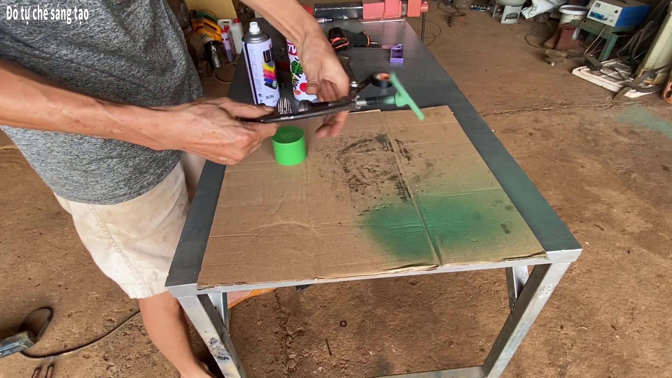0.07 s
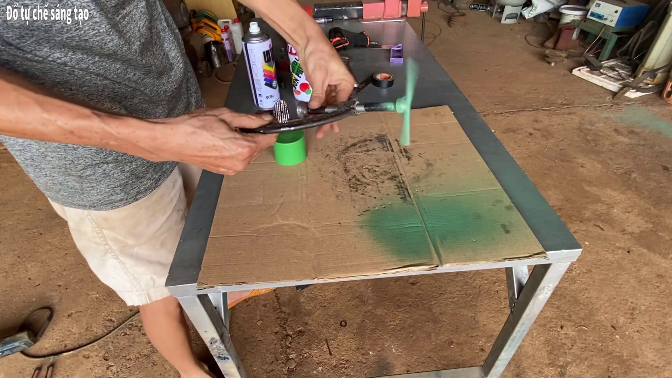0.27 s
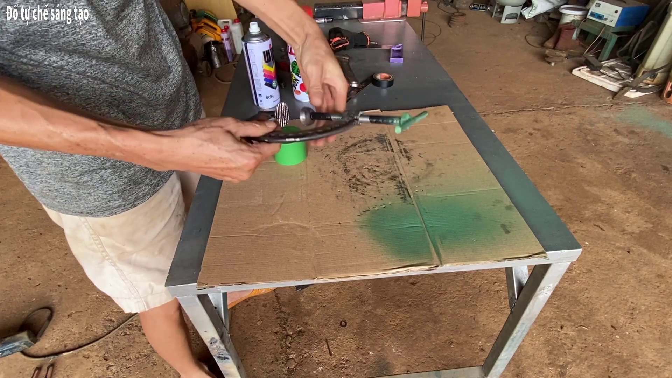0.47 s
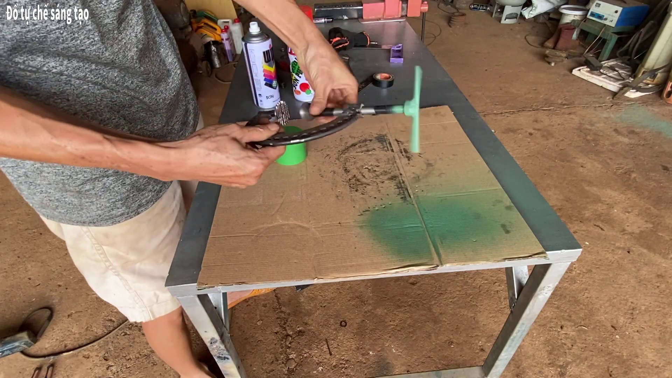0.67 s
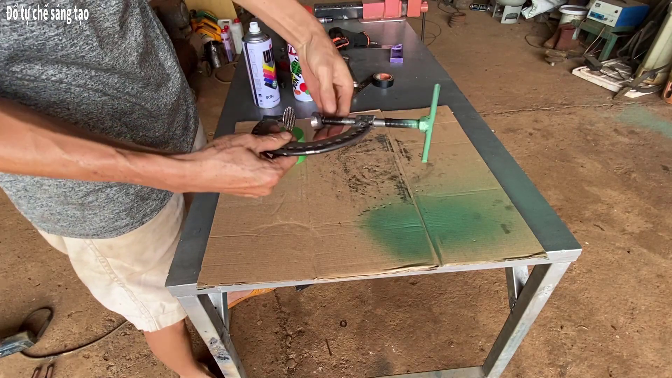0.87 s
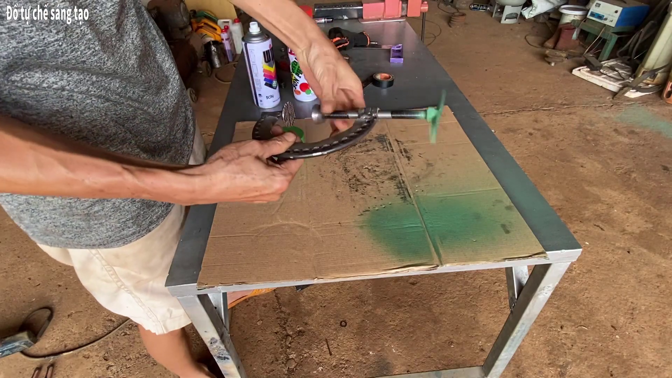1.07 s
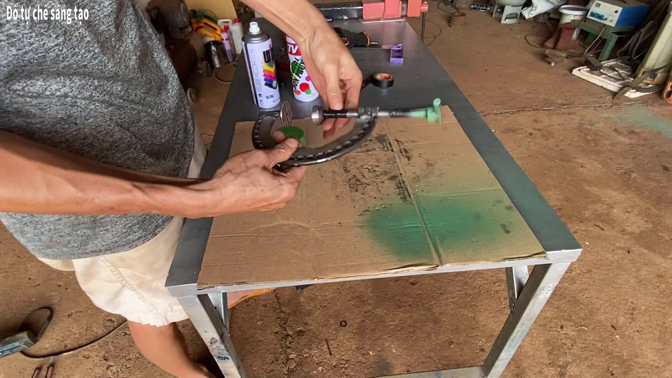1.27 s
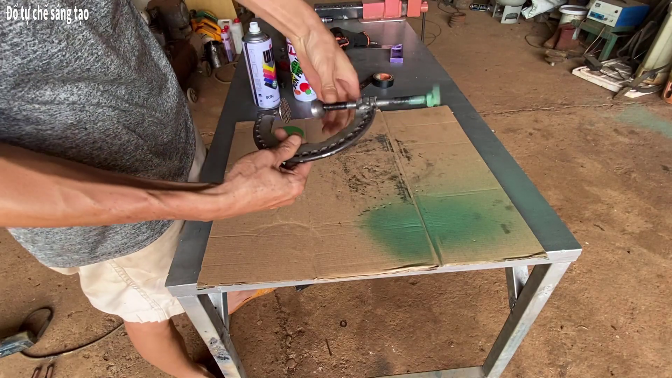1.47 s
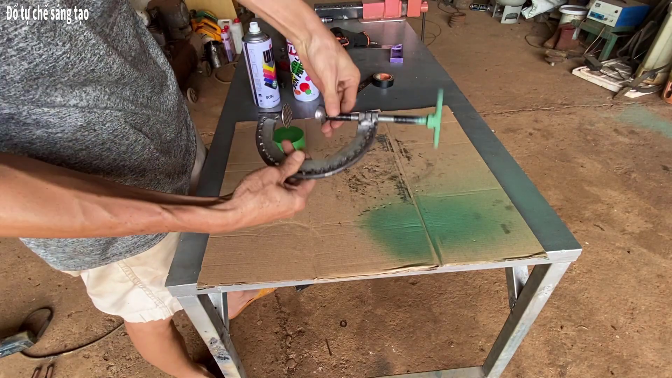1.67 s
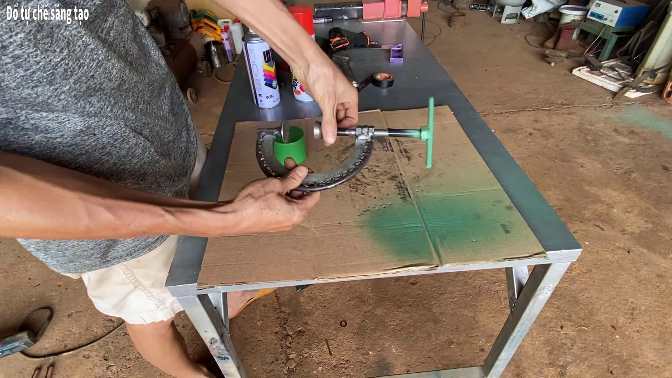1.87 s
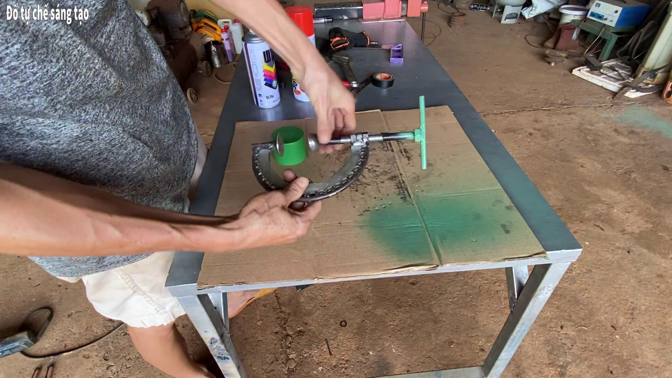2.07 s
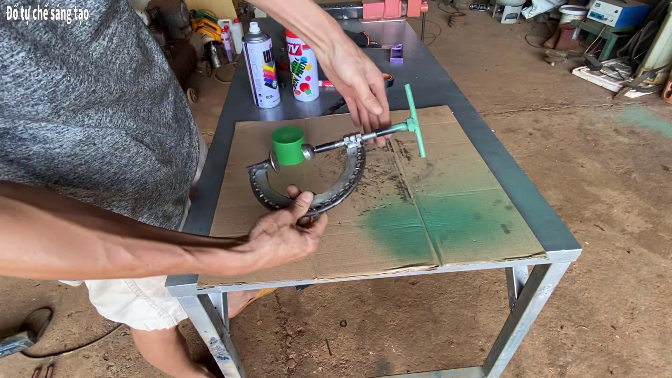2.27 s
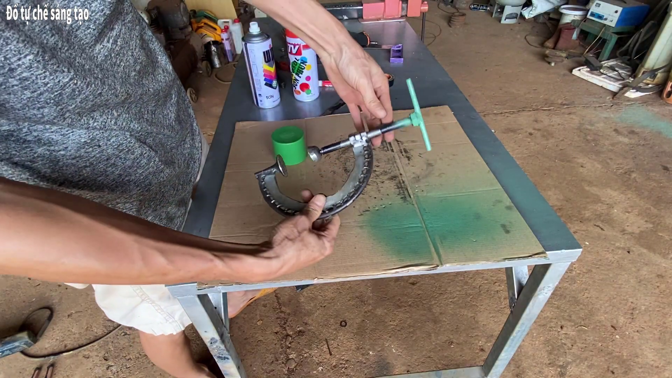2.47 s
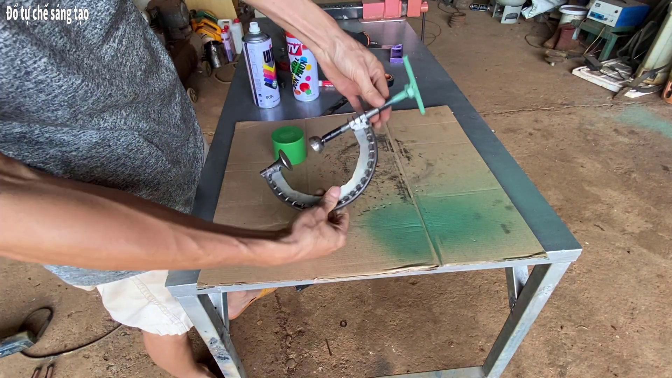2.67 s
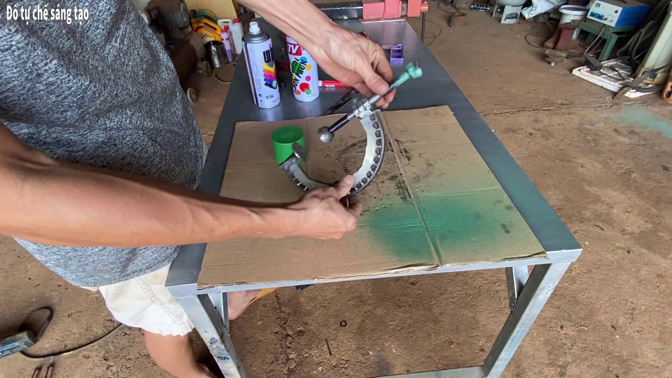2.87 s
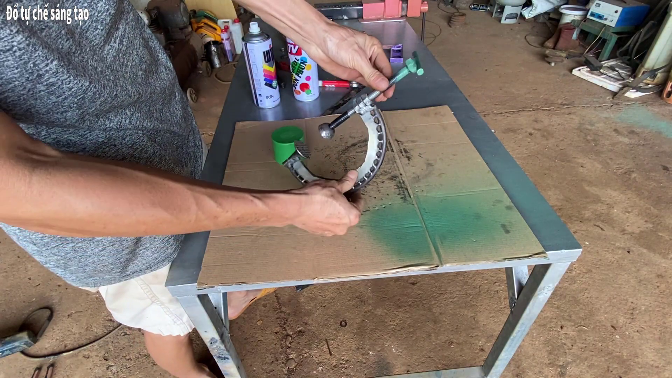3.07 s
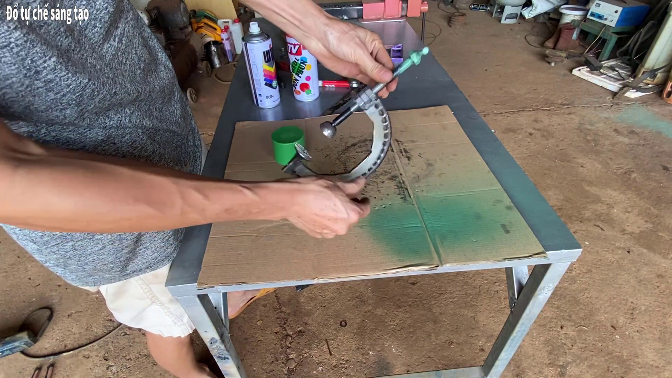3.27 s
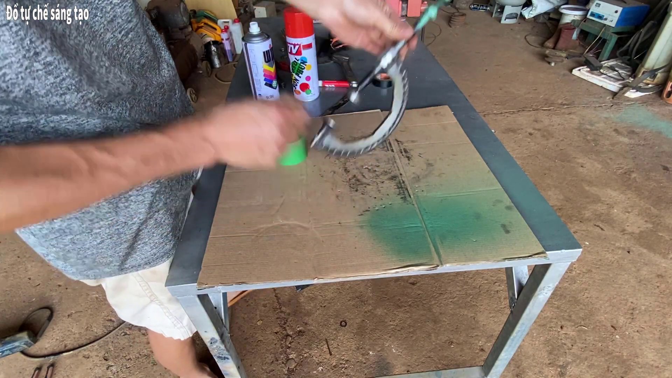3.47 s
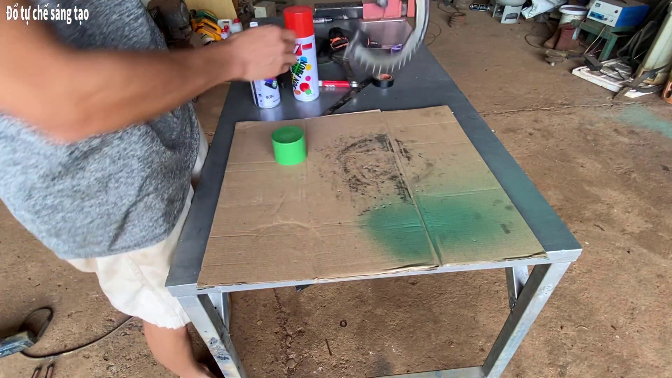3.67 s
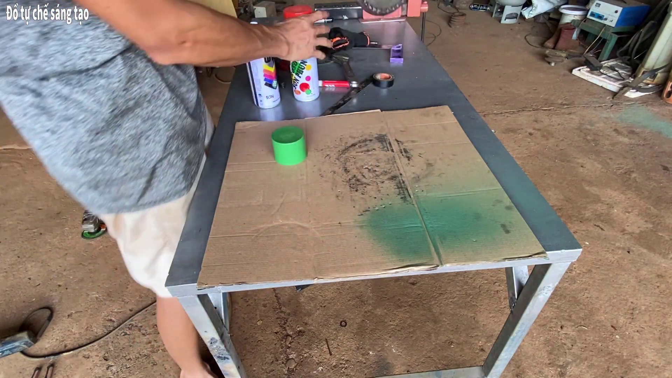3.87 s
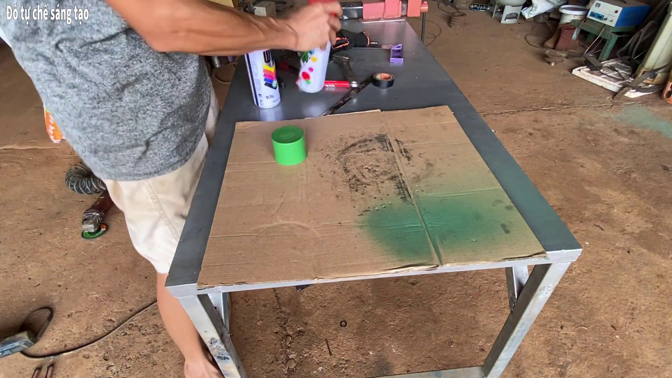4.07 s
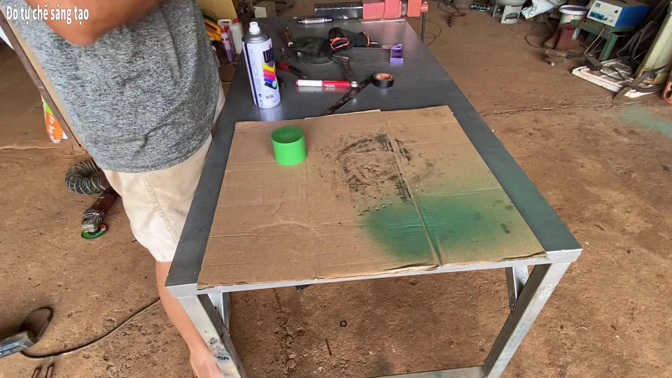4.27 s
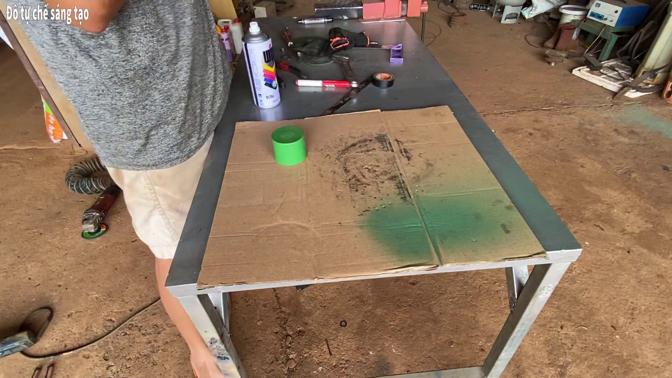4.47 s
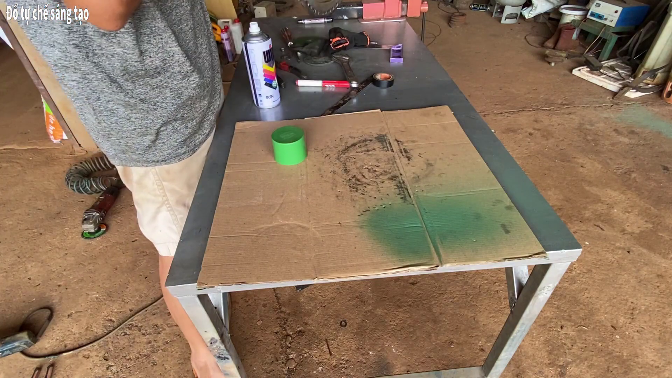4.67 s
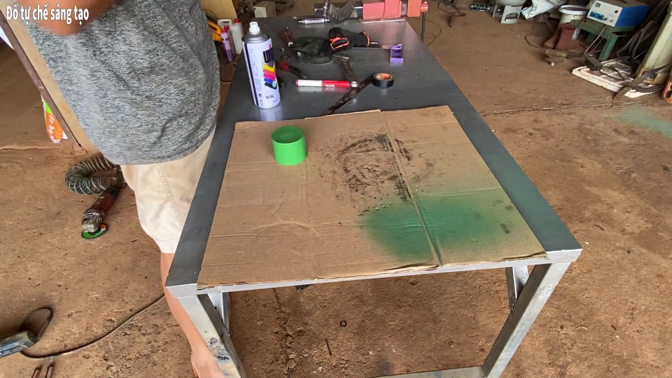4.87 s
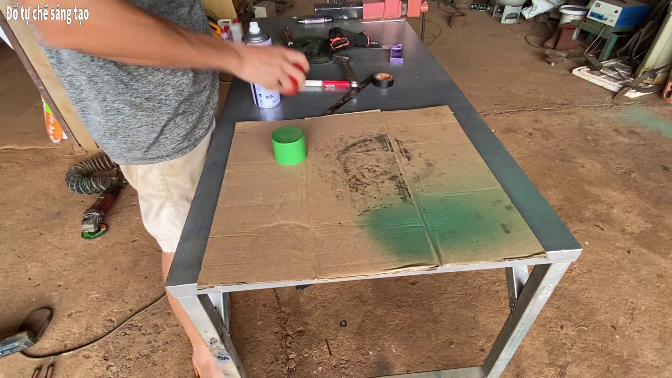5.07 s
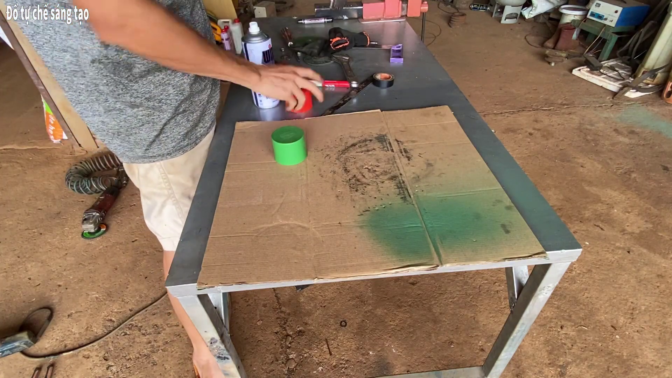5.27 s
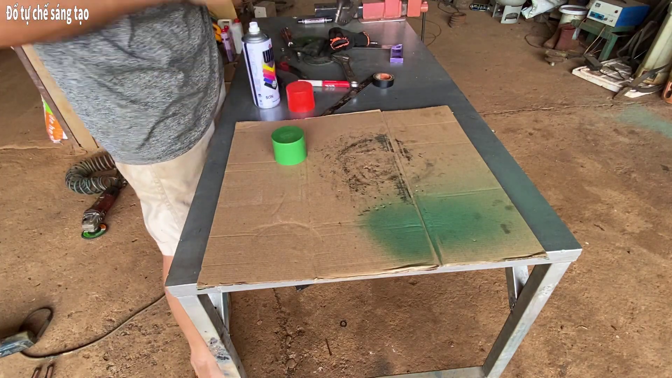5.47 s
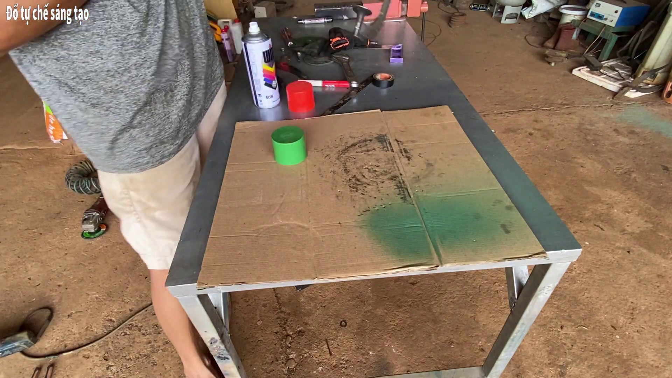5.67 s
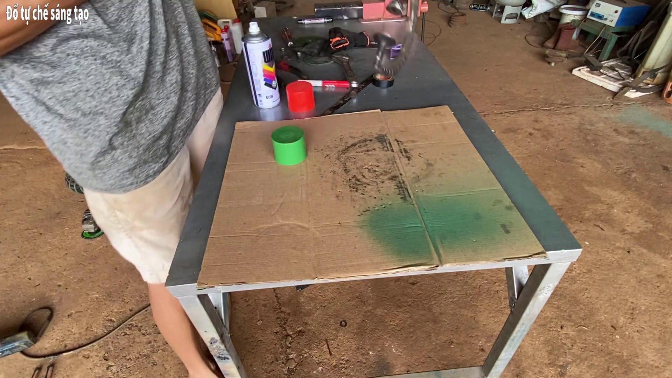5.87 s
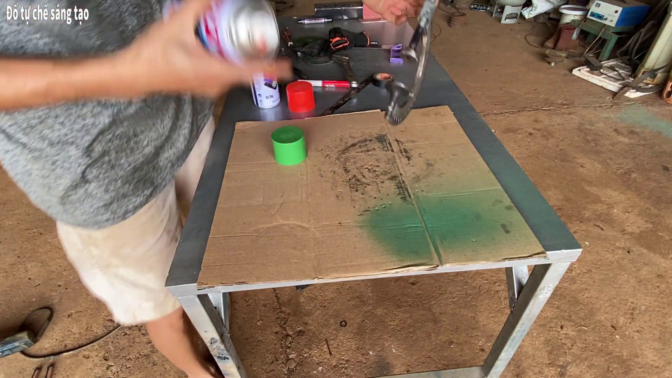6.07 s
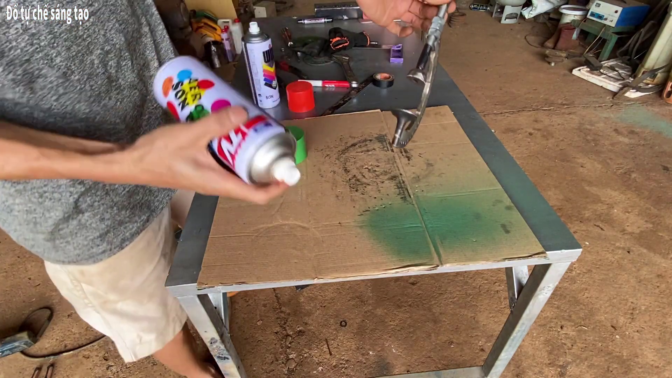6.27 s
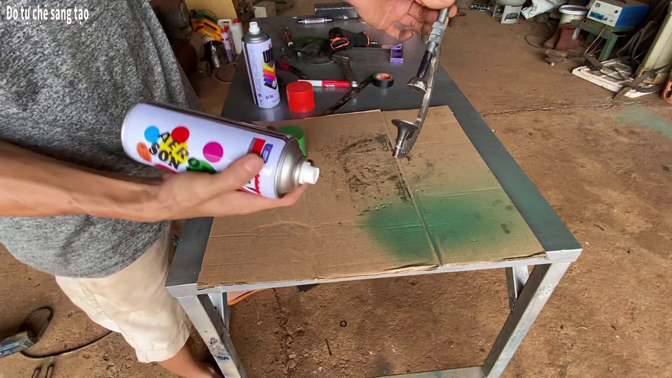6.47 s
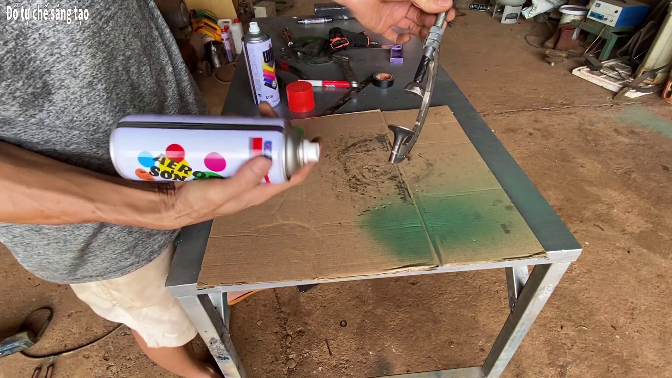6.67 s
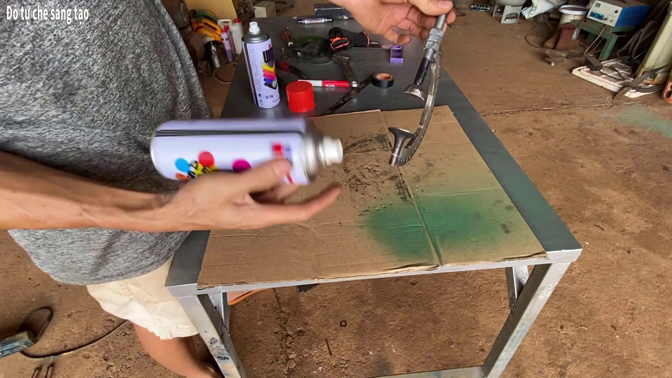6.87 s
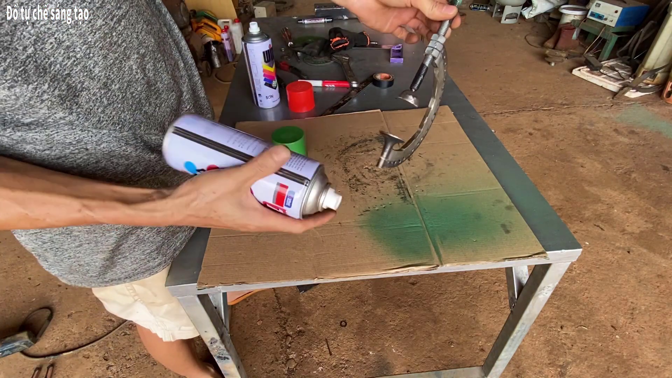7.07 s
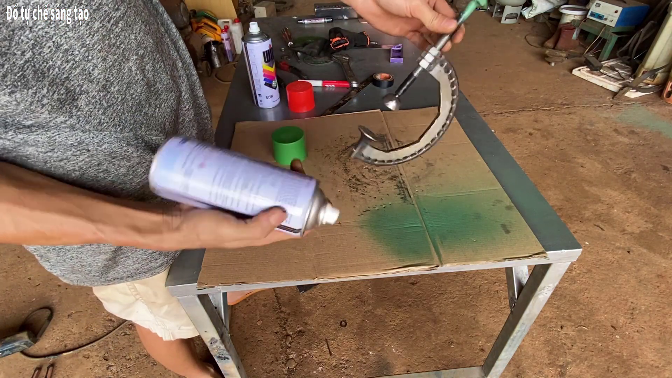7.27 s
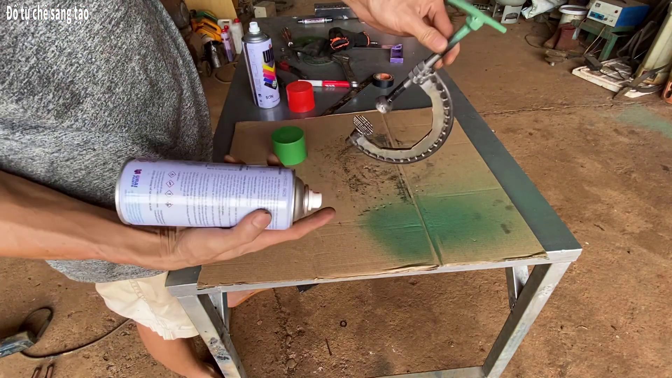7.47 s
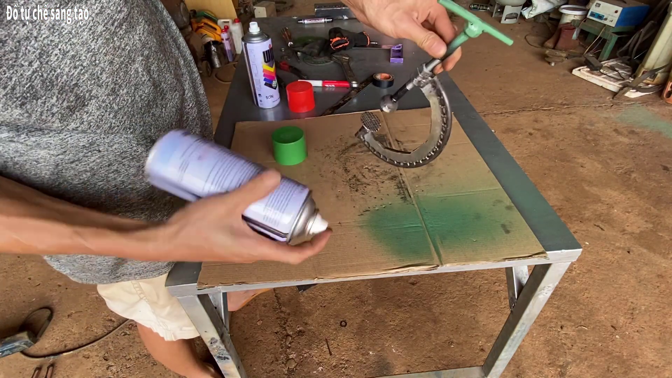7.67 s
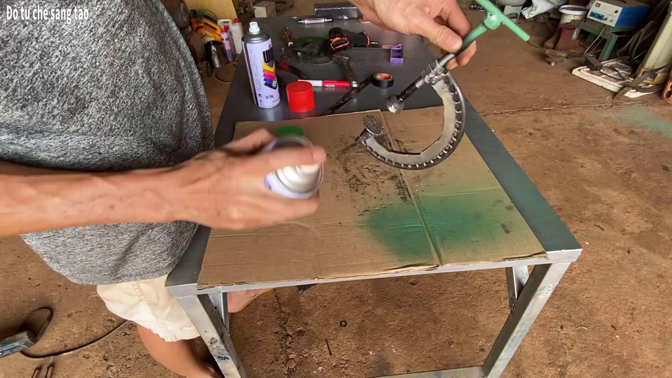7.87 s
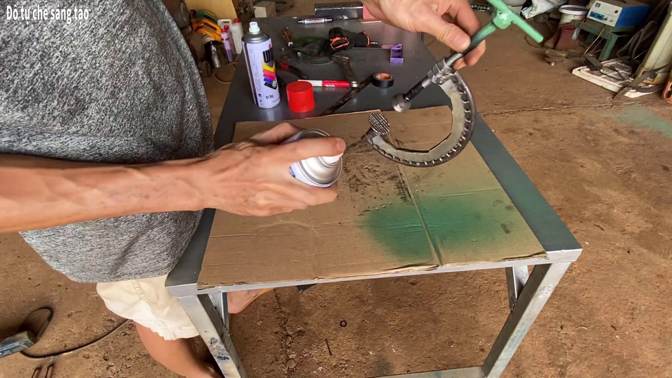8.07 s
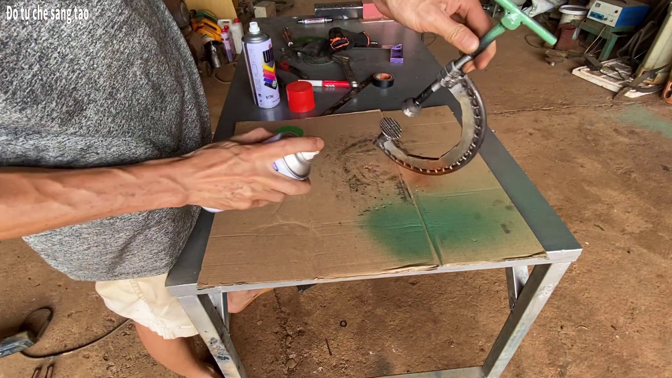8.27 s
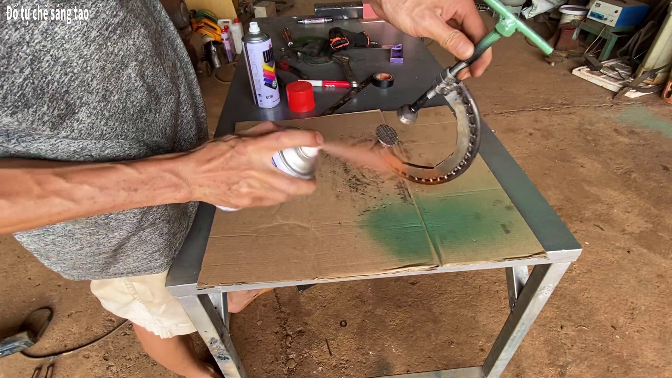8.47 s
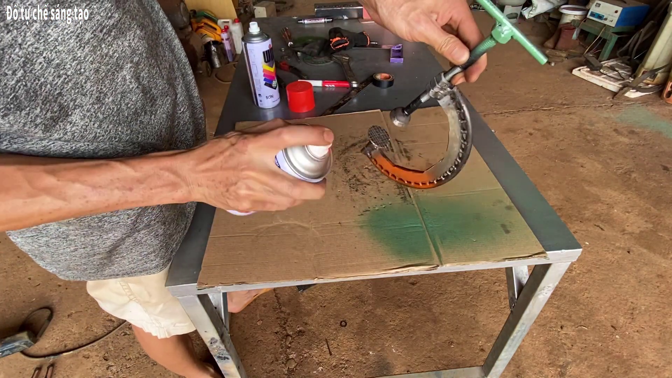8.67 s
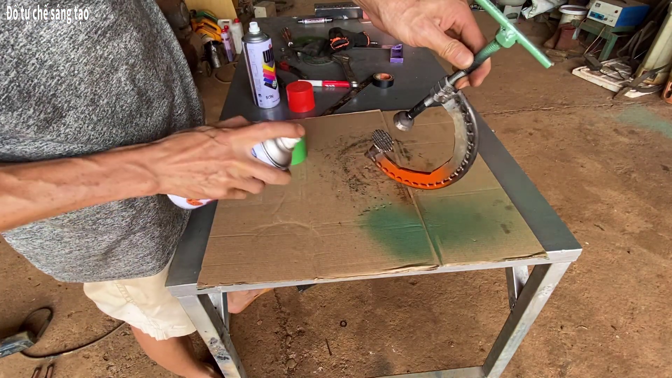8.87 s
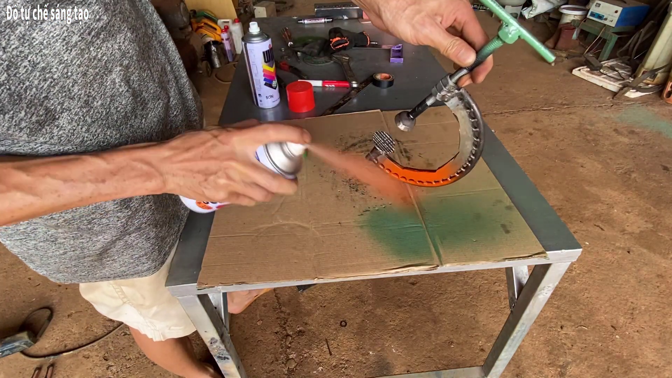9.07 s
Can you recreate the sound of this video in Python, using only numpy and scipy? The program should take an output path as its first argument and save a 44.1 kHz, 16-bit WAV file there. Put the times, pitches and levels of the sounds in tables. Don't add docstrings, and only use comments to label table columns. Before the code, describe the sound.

In an open shed, a screw ticks softly, plastic and bench knock, a can's ball clatters, and brief aerosol puffs follow above idling engine hum.

```python
import sys
import numpy as np
from scipy import signal
from scipy.fft import rfft, irfft, next_fast_len
from scipy.io import wavfile
from scipy.ndimage import uniform_filter1d

SR = 44100
rng = np.random.default_rng(int(sys.argv[2]) if len(sys.argv) > 2 else 0)


def master(y):
    cut = np.clip(np.atleast_2d(y).T, -1, 1)
    pcm = np.round(cut * 32767)
    wavfile.write(sys.argv[1], SR, pcm.astype(np.int16))


def magnitude_from_level(level_db):
    exponent = np.asarray(level_db, float) / 20
    return 10 ** exponent


N = 402612
TIME, SIZE = np.arange(N) / SR, next_fast_len(N)
HZ = np.fft.rfftfreq(SIZE, 1 / SR)
SIDES = np.array([[1], [-1]])

# (frequency [Hz], level [dB], t60 [s])
CAN_MODES = [(660, -4, 0.1), (835, -20, 0.08), (1110, -30, 0.17), (1266, -13, 0.23), (1418, 1, 0.091),
             (1785, 7, 0.048), (2103, 3, 0.065), (2550, 0, 0.1), (3050, 9, 0.054), (3280, -5, 0.28),
             (3590, 2.5, 0.14), (5200, -23, .06)]
# (frequency [Hz], level [dB], t60 [s])
BENCH_MODES = [(134.5, -21, 0.066), (214, -6.5, 0.12), (294, -15, 0.076), (413.5, -7.5, 0.15),
               (639, -1.5, 0.095), (868, -5, 0.077), (1110, 3.5, 0.05), (1580, 3.5, 0.067),
               (1973, 5, 0.039), (2315, 8.5, 0.04), (2734, 12, 0.02), (3140, -5, 0.0077), (3900, 0, 0.011),
               (4500, -10, 0.022)]
# (frequency [Hz], level [dB], t60 [s])
BALL_MODES = [(1430, -12, 0.04), (2300, -10, 0.035), (2770, -1, 0.035), (3400, 0, 0.035), (3600, 0, 0.03),
              (4200, -2, 0.03), (4900, -4, 0.022), (5980, -8, 0.022), (7170, -1, 0.018), (8145, 1, 0.018),
              (9000, -3, .018), (9800, -6, .016), (11200, -5, 0.016), (12600, -3, 0.011)]


def unit(x):
    return x / np.sqrt(np.mean(x ** 2))


def on_log(table, hz):
    point_hz, value = np.array(table).T
    return np.interp(np.log(hz + 1), np.log(point_hz), value)


def colour(x, gain):
    return irfft(rfft(x, SIZE) * gain, SIZE)[..., :N]


def band(x, hz, width_hz):
    return signal.lfilter(*signal.iirpeak(hz, hz / width_hz, fs=SR), x)


def band_twice(x, hz, width_hz):
    return band(band(x, hz, width_hz), hz, width_hz)


def walk(rate_hz):
    hold = int(SR / rate_hz)
    steps = np.repeat(rng.standard_normal(N // hold + 1), hold)
    return 1.94 * uniform_filter1d(uniform_filter1d(steps, hold), hold)[:N]


def swell(peak_s, db, rise_s, fall_s):
    return magnitude_from_level(db - 30 * np.maximum((peak_s - TIME) / rise_s, (TIME - peak_s) / fall_s))


def gestures(rows):
    gains = np.array([swell(s, db, rise_s, fall_s) for s, db, _, rise_s, fall_s in rows]) + 1e-9
    total = gains.sum(0)
    bright = magnitude_from_level(np.array(rows)[:, 2]) @ gains / total
    return 20 * np.log10(total), 20 * np.log10(bright)


def blows(rows, upper_hz, damping=None):
    uppers = np.broadcast_to(upper_hz, len(rows))
    return [(s, db, hz, up, bright_db, damping or grip[0])
            for (s, db, hz, bright_db, *grip), up in zip(rows, uppers)]


def knocks(events, body, seconds, ring_db, ring_t60_s, crack_t60_s, crack_db, crack_hz, contact_s,
           spread_db, reach_db_per_octave, smear, pan_db, count):
    out = np.zeros(N + SR)
    t = np.arange(int(seconds * SR), dtype=np.float32) / np.float32(SR)
    body_hz, body_db, body_t60_s = np.repeat(body, count, axis=0).T
    for s, db, low_hz, high_hz, bright_db, damping in events:
        near_low_db = -reach_db_per_octave * np.abs(np.log2(body_hz / low_hz))
        near_high_db = bright_db - reach_db_per_octave * np.abs(np.log2(body_hz / high_hz))
        level_chance, tune_chance = rng.standard_normal((2, len(body_hz)))
        mode_db = body_db + spread_db * level_chance + np.maximum(near_low_db, near_high_db)
        gain = magnitude_from_level(np.r_[mode_db, ring_db, min(ring_db, 3) + bright_db])
        hz = np.r_[body_hz * (1 + smear * tune_chance), low_hz, high_hz]
        t60_s = np.r_[body_t60_s, ring_t60_s, .4 * ring_t60_s, crack_t60_s]
        fall = np.log(1000) * max(damping, .1) / t60_s
        decay = np.exp(-fall.astype(np.float32)[:, None] * t)
        ring = gain @ (np.sin((2 * np.pi * hz).astype(np.float32)[:, None] * t) * decay[:-1])
        centre_hz = np.sqrt(crack_hz * low_hz)
        crack = band_twice(rng.standard_normal(len(t)), centre_hz, 1.76 * centre_hz)
        crack = crack * (decay[-1] + 2.24 * decay[-1] ** 6)
        rise = (1 - np.exp(-t / contact_s)) * (1 - t / seconds)
        peak = magnitude_from_level(max(bright_db, 0)) / np.abs(ring * rise).max()
        i = int(s * SR)
        out[i:i + len(t)] += magnitude_from_level(db) * rise * (ring * peak + magnitude_from_level(bright_db + crack_db) * crack)
    return out[:N] * magnitude_from_level(pan_db * SIDES / 2)


def rub(level_db, bright_db, body, grain_rate_hz, grain_db, widen, bright_hz, pan_db):
    hits = rng.random(N) < grain_rate_hz / SR
    sizes = magnitude_from_level(grain_db * np.minimum(rng.exponential(size=N), 3.5))
    grains = hits * sizes * rng.standard_normal(N)
    ring = unit(sum(magnitude_from_level(db) * unit(band(grains, hz, widen / t60_s)) for hz, db, t60_s in body))
    scratch = unit(band_twice(grains, bright_hz, 1.9 * bright_hz))
    return magnitude_from_level(level_db + pan_db * SIDES / 2) * (ring + magnitude_from_level(bright_db) * scratch)


def whistle(curve, breath_samples):
    s, hz, db = np.transpose(curve)
    breath = unit(uniform_filter1d(rng.standard_normal(N), breath_samples))
    gain = magnitude_from_level(np.interp(TIME, s, db, left=-140, right=-140)) * (1.74 + breath)
    return 3 * gain * np.sin(2 * np.pi * np.cumsum(np.interp(TIME, s, hz)) / SR)


def spray():
    # (opens [s], shuts [s], opening level [dB], shutting level [dB])
    puffs = [
        (8.132, 8.292, -32, -33),
        (8.368, 8.385, -41, -44),
        (8.476, 8.585, -31.5, -31.5),
        (8.75, 8.865, -34, -35),
        (9.052, 9.112, -35, -30),
    ]
    # (frequency [Hz], level per Hz [dB])
    jet_tone = [(150, -14), (400, -20), (1500, -16), (2500, -8), (3200, -5), (3900, -7), (5600, -6),
                (9800, -1), (12000, -7.5), (13600, 0.5), (15500, -4.5)]
    # (frequency [Hz], share)
    jet_apart = [(400, 1.1), (2200, .7), (3000, .2), (3600, .25), (4600, 1.3), (7000, 1.0), (10500, .8)]
    rise_s, shut_s, low_hiss_db = 0.018, 0.018, -12
    gas = rng.standard_normal((3, N)) * magnitude_from_level(1.2 * walk(250))
    ports = gas[0] + colour(gas[1:], on_log(jet_apart, HZ))
    jet = unit(colour(ports, magnitude_from_level(on_log(jet_tone, HZ))))
    low = signal.lfilter(*signal.butter(2, 2500, fs=SR), jet)
    hiss = jet - low + unit(low) * magnitude_from_level(low_hiss_db)
    out = 0
    for opens_s, shuts_s, first_db, last_db in puffs:
        flow = np.clip((TIME - opens_s) / rise_s, 0, 1) * np.exp(-np.maximum(TIME - shuts_s, 0) / shut_s)
        out = out + flow * magnitude_from_level(np.interp(TIME, (opens_s, shuts_s), (first_db, last_db))) * hiss
    return out


def nozzle_and_cap():
    # (time [s], peak [dB], ring [Hz], brightness [dB])
    nozzle_clicks = [(8.1123, -22.5, 1313, 5), (8.1286, -36.5, 2700, 11), (8.1245, -19, 7000, 6.5),
                     (8.313, -21, 9540, -15), (8.3585, -20, 4620, 4.5), (8.3815, -32, 9650, 1.5),
                     (8.4567, -38, 3970, 6), (8.4999, -27, 10400, 4), (8.6505, -33, 5100, 3.5),
                     (8.6991, -33.5, 3900, -13), (8.7598, -35.5, 5370, -3), (9.065, -54.5, 9800, -5)]
    # (time [s], peak [dB], ring [Hz], brightness [dB])
    cap_clicks = [(4.36, -33, 5500, 8), (4.378, -24, 3740, -7), (4.393, -21, 3730, -3),
                  (4.412, -35, 3500, -12), (4.455, -20, 3300, -5), (4.4775, -25, 3960, 3),
                  (4.512, -26, 3120, -9), (4.5255, -39, 2300, -20), (4.621, -37.5, 2880, 6),
                  (4.704, -25, 6300, -4), (4.72, -28, 5600, -15), (4.769, -35.5, 4700, 5.5),
                  (4.806, -27, 3530, -2), (4.017, -48, 9400, 0), (4.147, -40, 5300, -5),
                  (4.1735, -46, 5500, -5), (6.343, -49, 12700, 0)]
    return knocks(blows(nozzle_clicks + cap_clicks, upper_hz=7000, damping=2.6), BALL_MODES, 0.1,
                  ring_db=.1, ring_t60_s=0.095, crack_t60_s=0.053, crack_db=1.0, crack_hz=7600,
                  contact_s=0.00099, spread_db=0.96, reach_db_per_octave=3.6, smear=0.077, pan_db=1.0, count=6)


def mixing_ball():
    # (time [s], peak [dB], ring [Hz], brightness [dB])
    ball_knocks = [(6.4297, -17, 4740, 0), (6.4971, -39, 4000, 1), (6.5094, -31, 10200, -3.5),
                   (6.5, -28, 1530, -6), (6.512, -30, 1700, -18), (6.622, -37, 5200, 4),
                   (6.952, -52, 5230, -4), (6.5394, -43, 4900, -1), (6.5666, -21.5, 3210, -1),
                   (6.6019, -42, 4500, -1), (6.6159, -39.5, 4620, 4), (6.6384, -32, 4400, -19),
                   (6.6483, -27.5, 5000, -5.5), (6.6744, -43, 5040, 3), (6.6817, -40.5, 3800, 12.5),
                   (6.7266, -40.5, 2960, 5),
                   (7.0603, -14, 4240, -12), (7.0611, -15, 2960, -15), (7.0685, -40, 3640, -13),
                  (7.199, -56, 8500, 1), (7.108, -30.5, 3040, -1.5), (7.1504, -45, 3140, 5),
                  (7.163, -35.5, 2320, -6), (7.2167, -24, 5490, -5), (7.2196, -20, 8700, -1.5),
                  (7.25, -27.5, 4600, -25), (7.27, -37, 4550, -1), (7.31, -39, 4270, -1),
                  (7.311, -37.5, 900, 0), (7.271, -37, 1180, 3), (7.3266, -29, 4630, -25),
                  (7.3414, -30, 5050, -3), (7.361, -39, 4350, -7), (7.3829, -35, 3840, -2),
                  (7.388, -31.5, 2530, -6), (7.4052, -41.5, 4950, -1.5), (7.481, -44, 4160, -22),
                  (7.6174, -47, 4600, -1), (7.6722, -27, 4340, -1.5), (7.686, -30, 4500, -14)]
    # (start [s], level [dB], fade [s])
    rolls = [
        (6.431, -49.5, 0.61),
        (7.06, -54, 0.5),
        (7.3, -57, 0.3),
        (7.62, -62.5, 0.57),
    ]
    out = knocks(blows(ball_knocks, upper_hz=5700, damping=2.4), BALL_MODES, 0.13,
                 ring_db=6.6, ring_t60_s=.05, crack_t60_s=0.056, crack_db=3.7, crack_hz=3250,
                 contact_s=0.00056, spread_db=4, reach_db_per_octave=9.2, smear=0.072, pan_db=2.5, count=5)
    rows = [(s, db, .1, .03, fall_s) for s, db, fall_s in rolls]
    return out + rub(*gestures(rows), BALL_MODES, 2500, grain_db=3.6, widen=15.0, bright_hz=3000, pan_db=0.47)


def can_in_hand():
    # (time [s], peak [dB], ring [Hz], brightness [dB], grip damping [factor])
    can_knocks = [(3.748, -31.5, 892, -4, 2.1), (3.959, -51, 6140, 7.5, 1.8),
                  (4.172, -36, 2524, -12.5, 0.48), (4.359, -26, 1075, -11, 0.53),
                  (4.375, -25, 1092, -13.5, 0.39), (4.436, -28.5, 1116, -31, 2),
                  (4.452, -37, 1800, -8, 2.3), (4.476, -33, 690, 8.5, 4.7), (4.511, -21.5, 1310, -10, 3.7),
                  (4.543, -39, 1234, -22, 1.2), (4.622, -26, 1110, -12, 5.7), (4.703, -42, 4800, -11, 5),
                  (4.804, -25, 1040, -11, 12), (4.864, -43, 820, 2, 2.6), (4.938, -35.5, 1490, -3, 4.1)]
    # (peak [s], level [dB], brightness [dB], rise [s], fall [s])
    hand_rubs = [
        (3.75, -42, -46, 0.023, 0.18),
        (4.2, -49.5, -13, 0.32, 0.044),
        (4.365, -46.5, 3, 0.0044, 0.25),
        (4.49, -54, 12, 0.09, 0.072),
        (4.78, -43.5, -6.5, 0.28, 0.32),
        (5.05, -62, 7.5, 0.12, 0.18),
        (5.29, -51.5, -32, 0.11, 0.16),
        (5.44, -78, -43, .06, 0.091),
        (6.42, -56.5, -8, 0.65, 0.03),
    ]
    upper_hz = 3300 * 2 ** (.03 * np.array(can_knocks)[:, 3])
    out = knocks(blows(can_knocks, upper_hz), CAN_MODES, 0.28,
                 ring_db=5.3, ring_t60_s=0.12, crack_t60_s=0.29, crack_db=-0.75, crack_hz=6000,
                 contact_s=0.0015, spread_db=3.3, reach_db_per_octave=16.3, smear=0.0074, pan_db=1.3, count=2)
    return out + rub(*gestures(hand_rubs), CAN_MODES + BENCH_MODES, 4000,
                     grain_db=3.0, widen=7.4, bright_hz=5100, pan_db=.1)


def bench_top():
    # (time [s], peak [dB], ring [Hz], brightness [dB], damping [factor])
    bench_knocks = [(3.96, -32, 418, -5.5, 0.92), (4.768, -31, 820, -25, 6.2), (4.7716, -19.5, 347, 2, 8),
                    (4.776, -28, 177, -2, 4.4), (5.271, -17.5, 1110, -10, 1.9),
                    (5.273, -26.5, 627, -5.5, 1.2), (5.363, -23, 640, -10.5, 2.1),
                    (5.4163, -22, 605, -3, 2.35), (5.418, -28, 3155, -12, 0.45),
                    (5.853, -59, 375, -11, 0.46), (6.024, -48, 357, -4, 2.3), (6.037, -41.5, 338, -1, 10.6)]
    # (time [s], frequency [Hz], level [dB])
    plate_hum = [
        (4.79, 290, -78),
        (4.83, 345, -72),
        (4.9, 325, -73),
        (4.96, 372, -66),
        (5.02, 350, -68),
        (5.04, 340, -76),
        (5.09, 335, -70),
        (5.2, 350, -73),
        (5.27, 340, -82),
    ]
    upper_hz = 2.27 * np.array(bench_knocks)[:, 2]
    out = knocks(blows(bench_knocks, upper_hz), BENCH_MODES, 0.44,
                 ring_db=1.5, ring_t60_s=.04, crack_t60_s=0.32, crack_db=1.2, crack_hz=1150,
                 contact_s=0.0046, spread_db=3.9, reach_db_per_octave=13.0, smear=0.0873, pan_db=-1.3, count=6)
    return out + whistle(plate_hum, 400)


def clamp_screw():
    # (time [s], peak [dB], ring [Hz], brightness [dB])
    ticks = [(0.0034, -37, 5540, 1), (0.0213, -34, 5480, 3), (0.3044, -41, 5140, -8),
             (0.395, -42.5, 4300, 12.5), (0.4148, -58, 5490, -7), (0.6777, -39.5, 5570, -7),
             (0.7077, -34.5, 5460, -1), (0.7266, -39.5, 5400, 10.5), (1.0445, -41, 5500, -24),
             (1.059, -38, 5540, -17), (1.0714, -51, 9800, 6), (1.103, -35.5, 5440, -2.5),
             (1.3354, -41, 4400, 7), (1.3717, -38.5, 3280, 4), (1.4324, -41, 4080, -1),
             (1.664, -43, 5540, -16), (1.685, -49, 5530, -17), (1.7364, -43, 5530, -18),
             (2.6224, -44, 5520, 1), (2.8494, -44.5, 3600, -8)]
    # (frequency [Hz], level [dB], t60 [s])
    screw_modes = [(866, 11.5, 0.025), (2114, 14, 0.021), (2893, 17, 0.016), (5530, -38, 0.057),
                   (7690, 13, 0.02), (8700, -1.5, 0.04), (9540, -30.5, 0.0081), (11780, 13, 0.014)]
    # (peak [s], level [dB])
    thread_rubs = [
        (0.0, -66),
        (0.414, -69),
        (0.721, -68.5),
        (1.073, -65),
        (1.34, -72),
        (1.745, -77),
        (2.63, -74),
    ]
    out = knocks(blows(ticks, upper_hz=7300, damping=1.24), screw_modes, 0.16,
                 ring_db=.1, ring_t60_s=0.13, crack_t60_s=0.026, crack_db=0.92, crack_hz=6700,
                 contact_s=0.0017, spread_db=4.2, reach_db_per_octave=9.9, smear=0.025, pan_db=.1, count=2)
    bright_db, rise_s, fall_s = 15.5, 0.089, 0.021
    rows = [(s, db, bright_db, rise_s, fall_s) for s, db in thread_rubs]
    return out + rub(*gestures(rows), screw_modes, 3000, grain_db=0.66, widen=27.0, bright_hz=2630, pan_db=0.1)


def singing():
    # (peak [s], fade [s], frequency [Hz], width [Hz], peak [dB])
    tones = [
        (4.93, .2, 180, 25, -58),
        (4.19, .2, 2580, 300, -61),
        (1.05, .6, 830, 80, -71),
        (2.95, .5, 220, 80, -66),
        (6.55, .35, 1300, 1200, -60),
        (3.07, .25, 1090, 70, -70),
        (5.47, .3, 640, 300, -57),
        (6.92, .12, 1450, 200, -70),
        (.915, .05, 3000, 250, -65),
        (1.15, .3, 3100, 90, -70),
    ]
    return sum(unit(band_twice(rng.standard_normal(N), hz, width_hz)) * swell(s, db, .45 * fall_s, fall_s)
               for s, fall_s, hz, width_hz, db in tones)


def cloth():
    # (peak [s], shuffle [dB], rustle relative [dB], rise [s], fall [s])
    moves = [
        (3.0, -66.5, -43, 1, 0.81),
        (3.93, -60, -13, 0.84, 0.48),
        (4.55, -72, 21, 0.33, 0.49),
        (4.87, -47, -9, 0.33, 0.51),
        (5.75, -70, 3.5, 0.46, 3.2),
        (6.3, -89, 9, 1, 0.52),
        (6.55, -55.5, -18, 0.32, 0.37),
        (6.9, -66.5, -15, 0.27, 15),
        (7.44, -70.5, -36, 0.73, 4.1),
        (8.35, -59.5, 14, 0.41, 1.53),
    ]
    shuffle_db, rustle_db = gestures(moves)
    noise = rng.standard_normal((2, 2, N))
    rustle = unit(band(band(noise[0], 5100, 6900), 7200, 13000)) * magnitude_from_level(rustle_db + 2.5 * walk(22))
    shuffle = unit(band(band(noise[1], 400, 3500), 320, 2600)) * magnitude_from_level(1.0 * walk(6.2))
    return magnitude_from_level(shuffle_db) * (rustle + shuffle)


def bird():
    # (time [s], frequency [Hz], level [dB])
    chirp = [
        (0.828, 4850, -70),
        (.845, 4050, -66),
        (.865, 3250, -59.5),
        (0.884, 2655, -66),
        (.92, 2330, -80),
    ]
    return whistle(chirp, 45)


def engine():
    # (time [s], firing pairs [1/s])
    pairs = [(0, 19.6), (1.1, 19.3), (1.7, 18.3), (2.9, 18.3), (3.9, 19.3), (4.9, 19.7), (5.3, 21.6),
             (6.3, 21.7), (6.8, 19.5), (8, 19.7), (8.75, 21), (9.13, 20.5)]
    # (frequency [Hz], width [Hz], level [dB])
    exhaust = [(47.7, 15, -3), (79.7, 44, 1.5), (93.9, 23.5, 2.5), (127, 28, -0.5), (162, 51, -12),
               (253, 410, -41)]
    pair_hz = np.interp(TIME, *np.transpose(pairs))
    cycle = np.floor(np.cumsum(2 * pair_hz * (1 + 0.0169 * walk(9)) / SR)).astype(int)
    firing_db = 1.8 * rng.standard_normal(N // 500) - 11.3 * (np.arange(N // 500) % 2)
    pulses = np.diff(cycle, prepend=0) * magnitude_from_level(firing_db)[cycle]
    out = 0
    for k, (hz, width_hz, db) in enumerate(exhaust):
        out = out + (-1) ** k * magnitude_from_level(db) * band_twice(pulses, hz, 1.4 * width_hz) * hz / width_hz
    return magnitude_from_level(-62 + 0.35 * (pair_hz - 22.6)) * unit(out)


def air():
    # (frequency [Hz], level per Hz [dB])
    air_tone = [(15, -42), (25, -18.5), (87, 1.5), (260, -14.5), (716, -19.5), (818, -20), (959, -21.5),
                (1470, -21), (3930, -13), (5560, -12.5), (8070, -29.5), (9220, -47.5), (10800, -46),
                (11800, -37.5), (13600, -33), (14600, -63)]
    # (frequency [Hz], correlation)
    likeness = [(60, 0.94), (130, 0.82), (290, 0.55), (640, -0.4), (1410, -0.45), (3100, 0.096),
                (15000, -0.019)]
    # (time [s], level [dB])
    breeze = [
        (0, -56.5),
        (3.6, -57.5),
        (4.9, -55.5),
        (5.6, -59.5),
        (7.2, -61),
        (8.0, -63.5),
        (9.13, -63),
    ]
    like = np.clip(on_log(likeness, HZ), -.99, .99)
    gain = magnitude_from_level(on_log(air_tone, HZ)) * np.sqrt(1 + like * SIDES)
    mid, side = colour(rng.standard_normal((2, N)), gain)
    flicker = magnitude_from_level(1.0 * walk(14) + .1 * SIDES)
    return magnitude_from_level(np.interp(TIME, *np.transpose(breeze))) * unit(mid + side * SIDES) * flicker


def shed(x):
    t60_s, treble_t60_s, level_db = 0.44, .17, 0.5
    t = np.arange(SR // 2) / SR
    noise = rng.standard_normal((2, len(t)))
    noise += signal.lfilter(*signal.butter(1, 600, fs=SR), noise[0] - noise)
    low = signal.lfilter(*signal.butter(1, 1200, fs=SR), noise)
    tail = low * magnitude_from_level(-60 * t / t60_s) + (noise - low) * magnitude_from_level(-60 * t / treble_t60_s)
    tail = tail * np.clip(t / 0.0035 - .3, 0, 1)
    tail = tail / np.sqrt(np.sum(tail ** 2) / 2)
    return magnitude_from_level(level_db) * signal.fftconvolve(x, tail, axes=1)[:, :N]


def at_ports(hands, bench, ball, nozzle):
    # (frequency [Hz], left lead [rad])
    lead_hands = [(400, .3), (550, 1.5), (1100, 1.6), (2000, 2.3), (3200, 4.0), (4200, 4.3), (5500, 5.2),
                  (6900, 7.8)]
    # (frequency [Hz], left lead [rad])
    lead_bench = [(400, .2), (700, 1.4), (2500, 1.2), (5000, 1.0), (6900, 2.6)]
    # (frequency [Hz], left lead [rad])
    lead_ball = [(400, .1), (900, 2.1), (2000, 2.4), (2900, 2.2), (3300, 3.7), (3600, 4.9), (4100, 5.9),
                 (5500, 6.3), (6900, 7.8), (7600, 6.5), (8300, 7.8), (9000, 7), (9700, 7), (10600, 5.2),
                 (11500, 4)]
    # (frequency [Hz], left lead [rad])
    lead_nozzle = [(400, .3), (700, 1.3), (2000, 1.7), (2700, 2.9), (3300, 3.14), (4200, 3.3), (5500, 5.6),
                   (6900, 8.7)]
    # (frequency [Hz], left lead [rad])
    lead_treble = [(7600, 9.8), (8300, 9.4), (9000, 7.5), (9700, 6.5), (10600, 5.3), (11500, 4)]
    places = ((hands, lead_hands + lead_treble), (bench, lead_bench),
              (ball, lead_ball), (nozzle, lead_nozzle + lead_treble))
    thud_floor = HZ ** 2 / (HZ ** 2 + 110 ** 2)
    out = 0
    for x, lead in places:
        lead_rad = on_log(lead, HZ) * np.minimum(HZ / 400, 1)
        out = out + colour(x, thud_floor * np.exp(.5j * lead_rad * SIDES))
    return out


def scene():
    hands = clamp_screw() + can_in_hand() + bird() + singing()
    bench = bench_top()
    ball = mixing_ball()
    nozzle = nozzle_and_cap() + spray()
    wet = magnitude_from_level(-6) * hands + magnitude_from_level(-7) * bench + magnitude_from_level(-11) * ball + magnitude_from_level(-12) * nozzle
    return at_ports(hands, bench, ball, nozzle) + shed(wet) + cloth() + engine() + air()


def low_pass(x):
    return signal.sosfilt(signal.butter(12, 16520, fs=SR, output="sos"), x)


def record(dry):
    # (frequency [Hz], level [dB])
    mic_tone = [(25, -2), (60, 1.5), (11600, 0.5), (15550, -0.5), (15850, -16), (16500, -40)]
    # (frequency [Hz], level [dB])
    port_balance = [(450, -.5), (1100, 3.5), (2100, -2.5), (3300, 1), (6000, 3), (7800, -1), (9000, 0)]
    # (frequency [Hz], share)
    one_capsule = [(10500, 0), (11300, .996)]
    in_step_hz, full_turn_hz = 10100, 3900
    share, mic = on_log(one_capsule, HZ), magnitude_from_level(on_log(mic_tone, HZ))
    ports = colour(dry, mic * np.sqrt(1 - share ** 2) * magnitude_from_level(on_log(port_balance, HZ) * SIDES / 2))
    slip = np.exp(-1j * np.pi * (HZ - in_step_hz) / full_turn_hz * SIDES)
    treble = colour(dry[0], mic * share * slip)
    return low_pass(ports + treble)


dry = scene()
out = record(dry)
master(out)
```